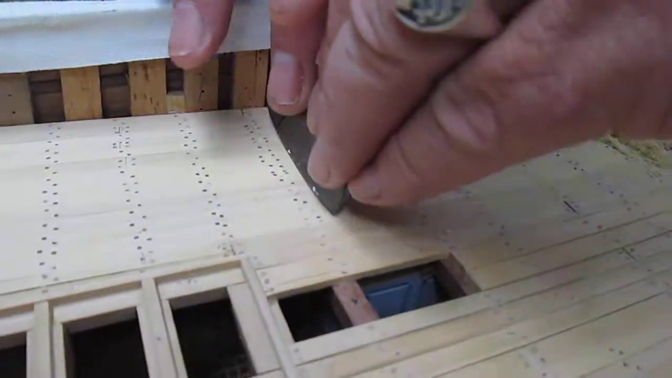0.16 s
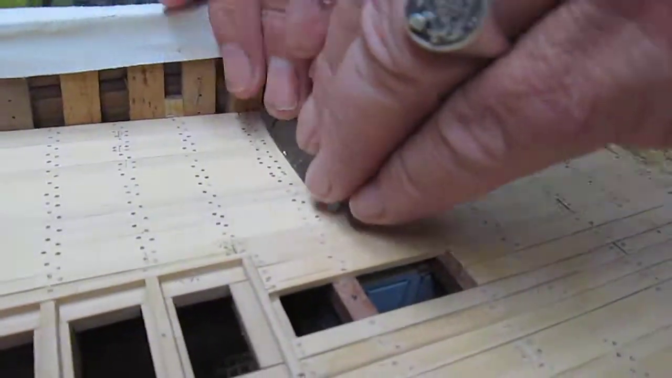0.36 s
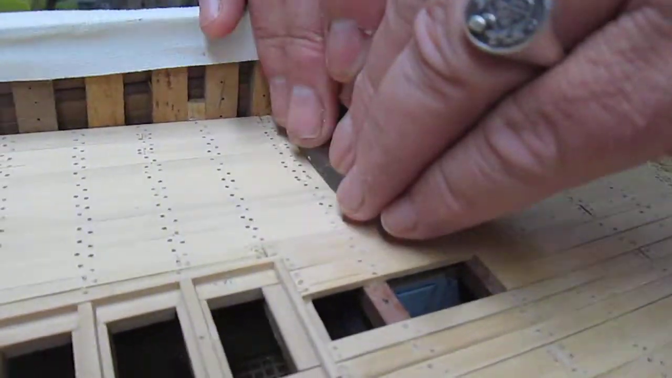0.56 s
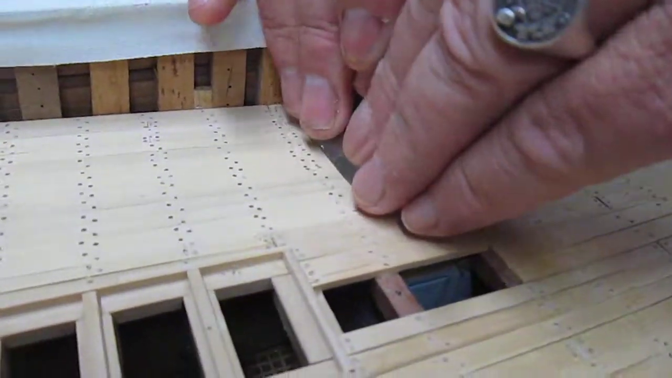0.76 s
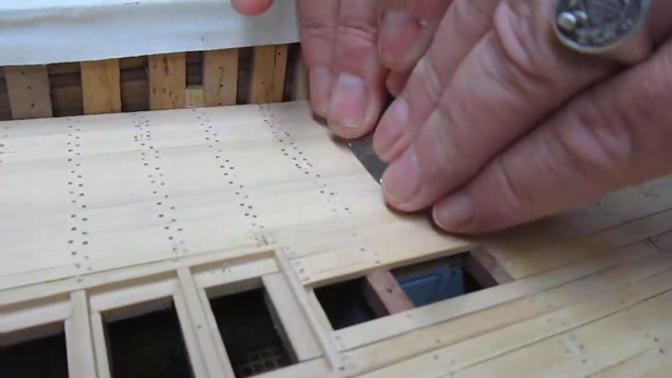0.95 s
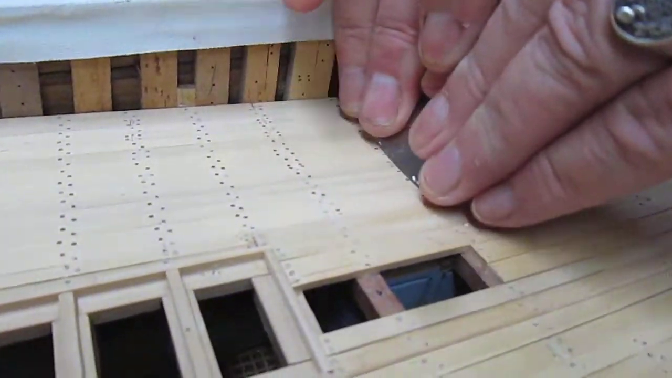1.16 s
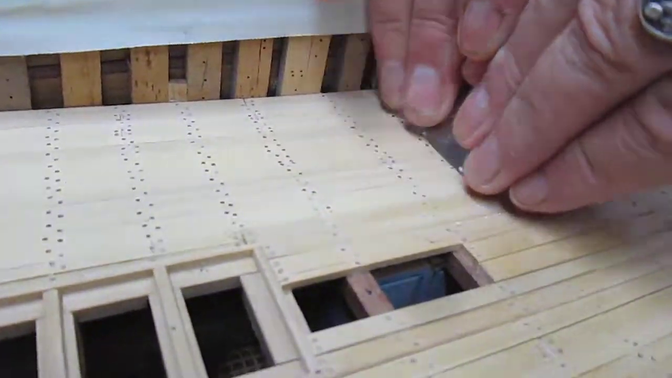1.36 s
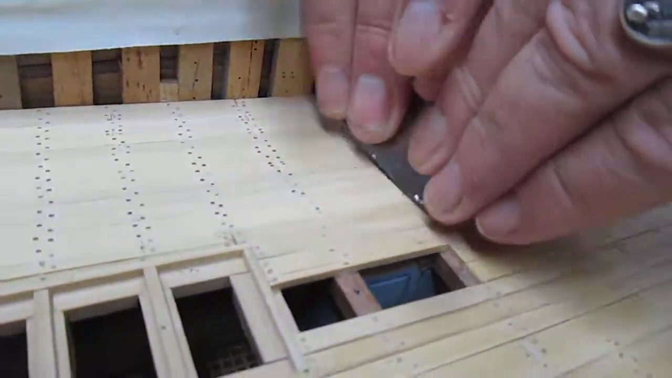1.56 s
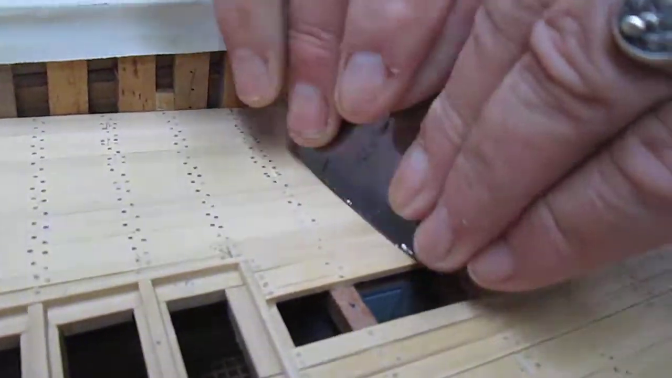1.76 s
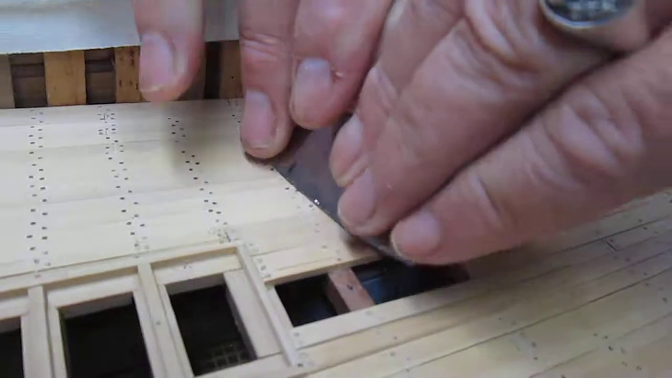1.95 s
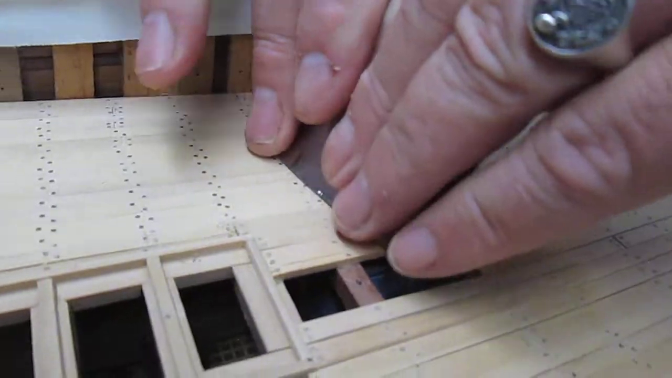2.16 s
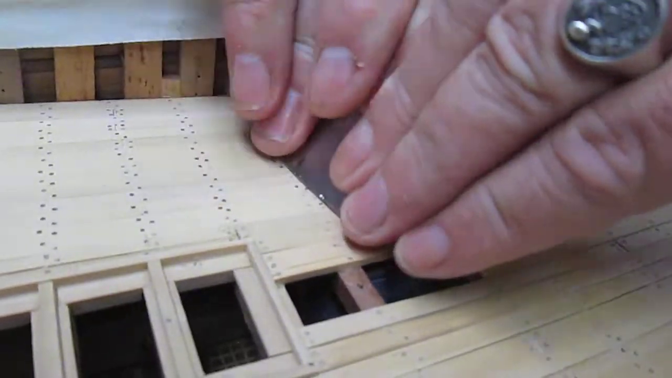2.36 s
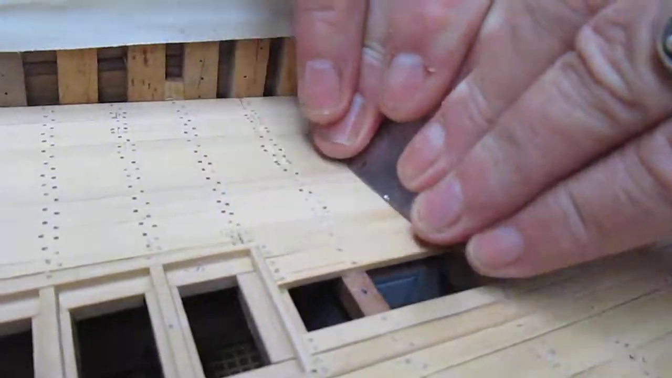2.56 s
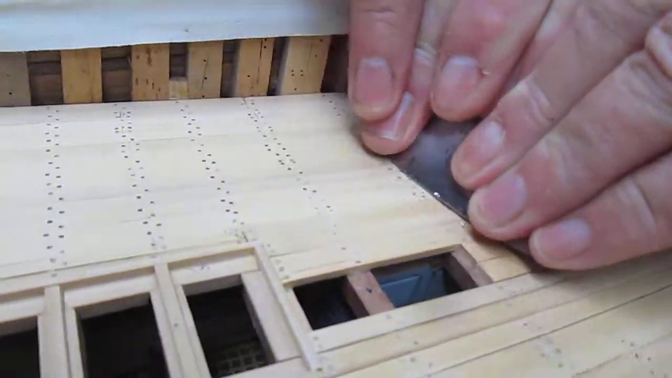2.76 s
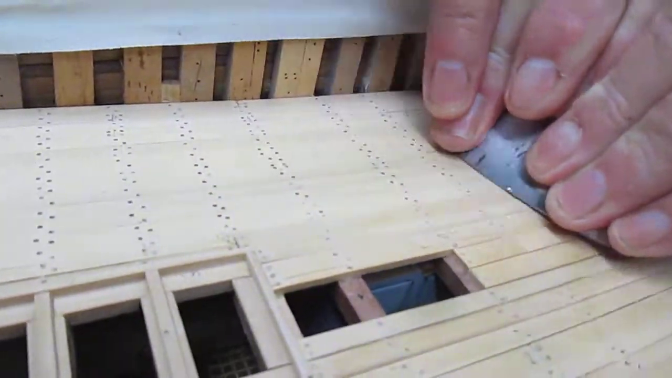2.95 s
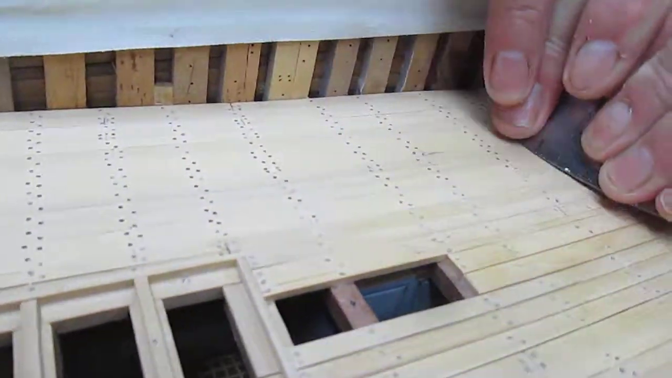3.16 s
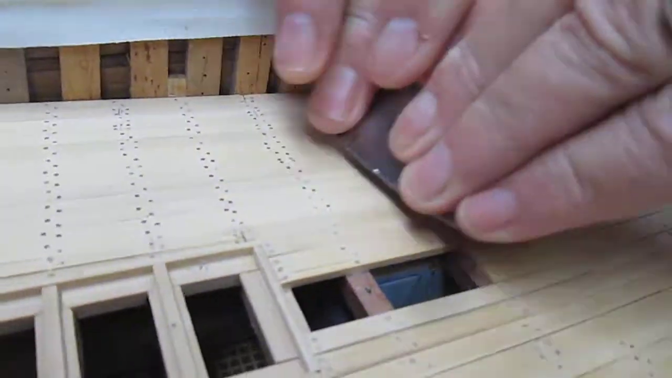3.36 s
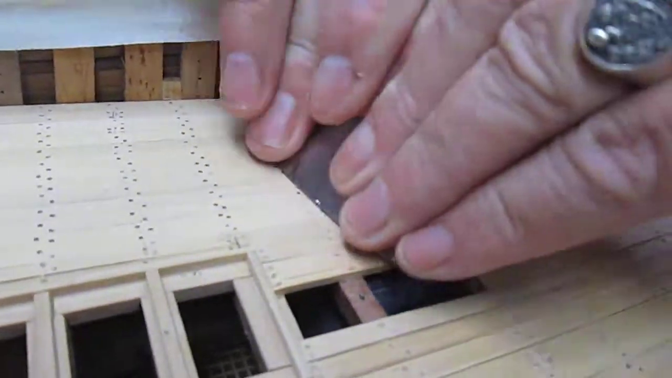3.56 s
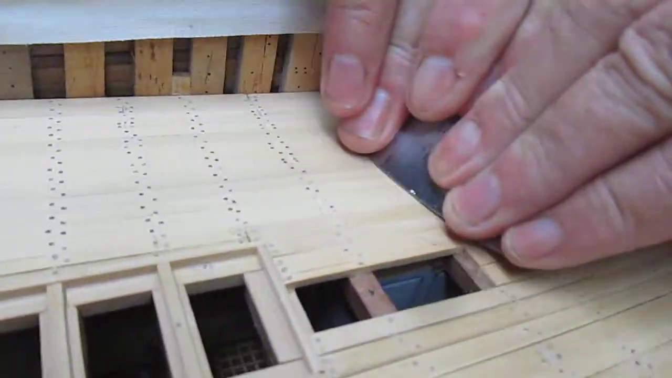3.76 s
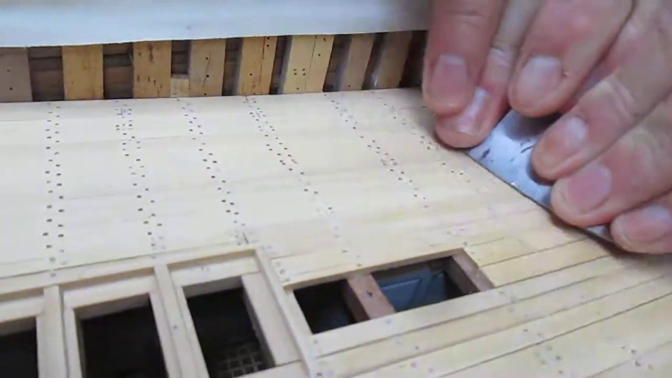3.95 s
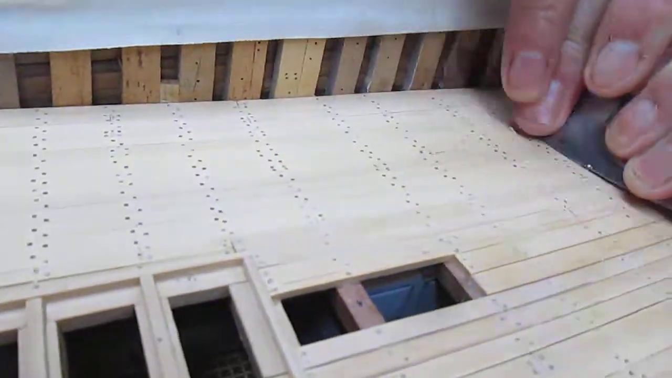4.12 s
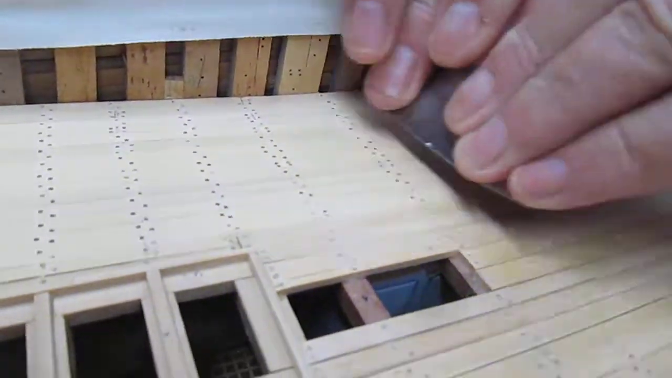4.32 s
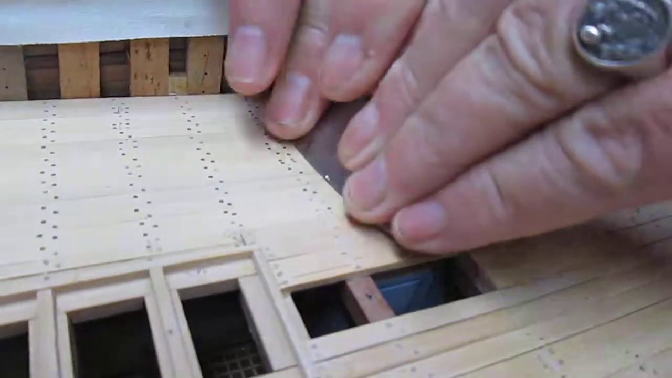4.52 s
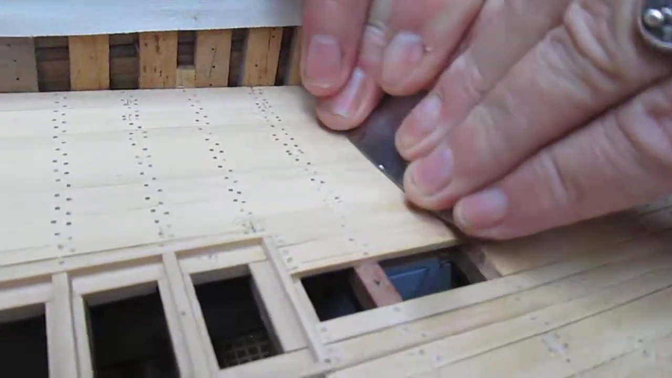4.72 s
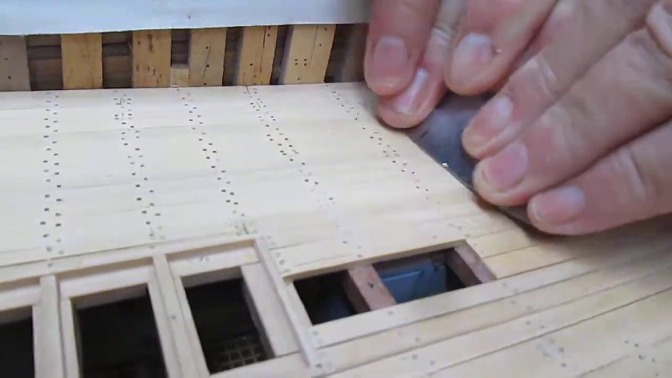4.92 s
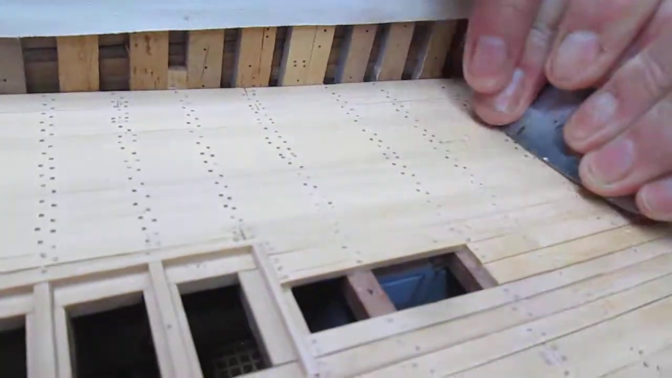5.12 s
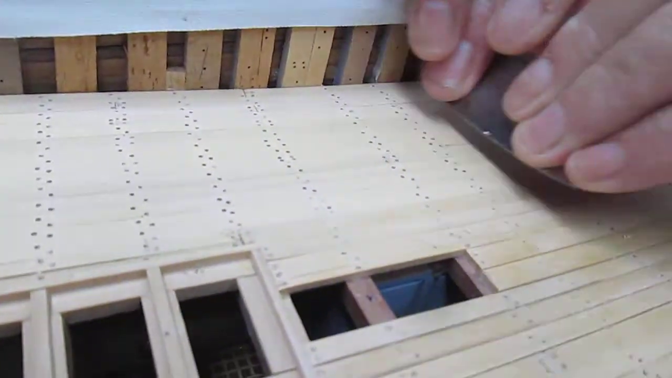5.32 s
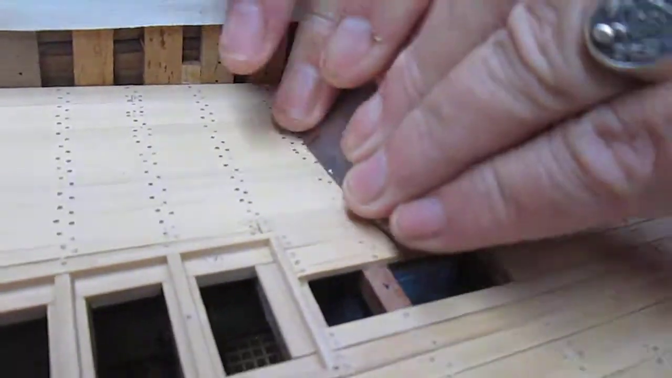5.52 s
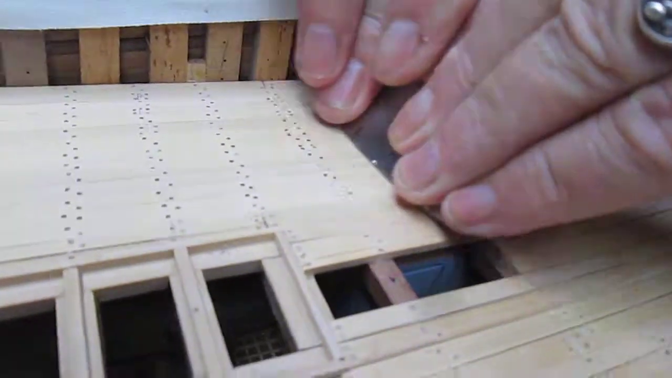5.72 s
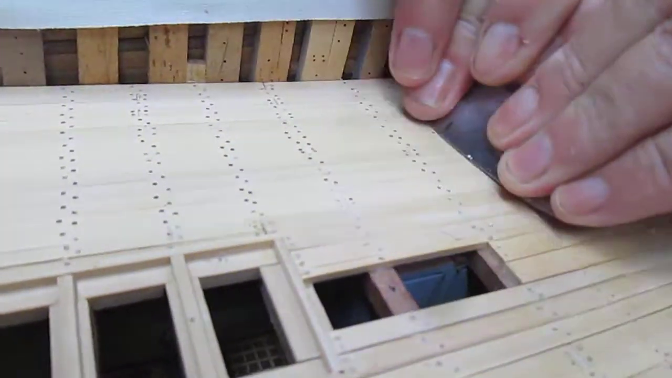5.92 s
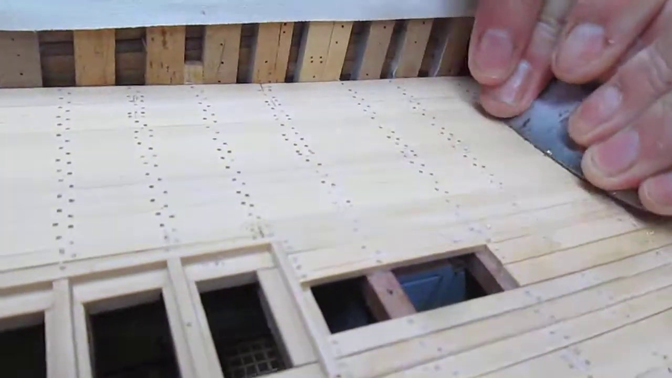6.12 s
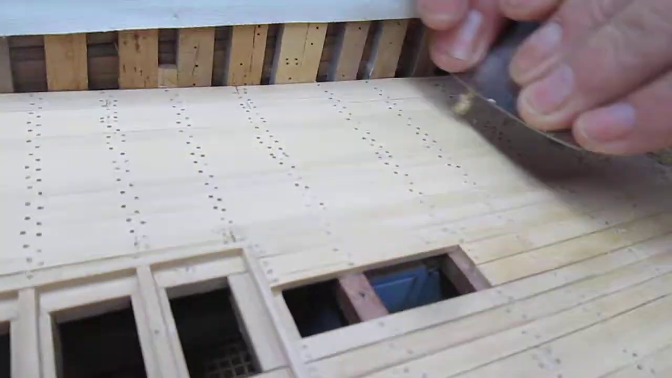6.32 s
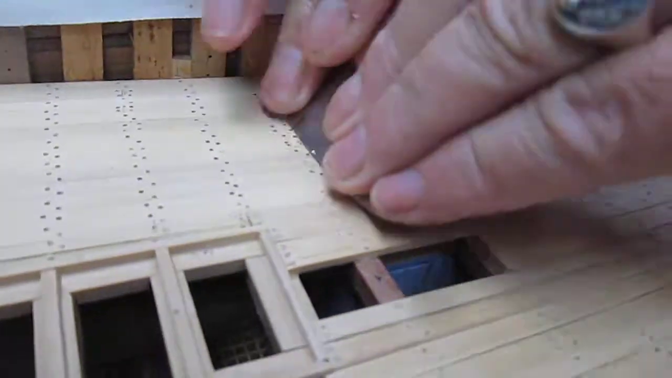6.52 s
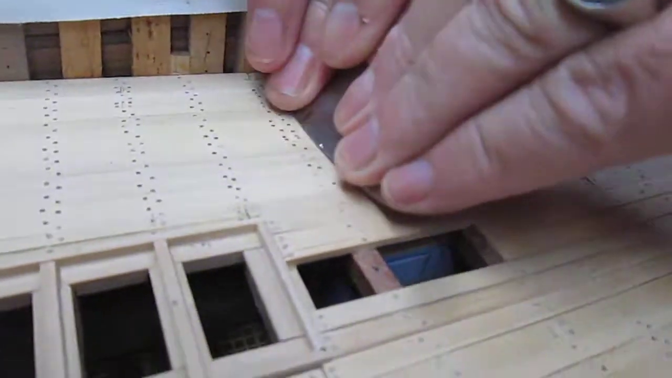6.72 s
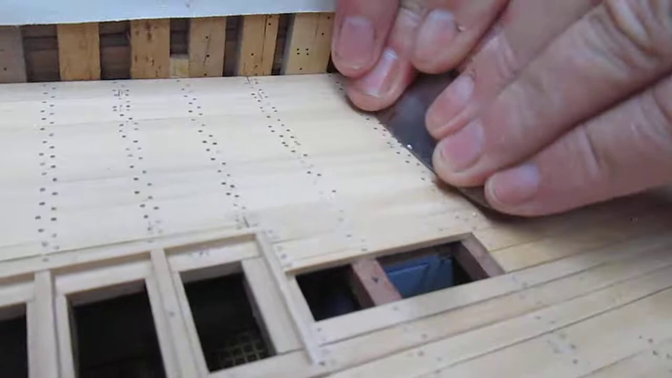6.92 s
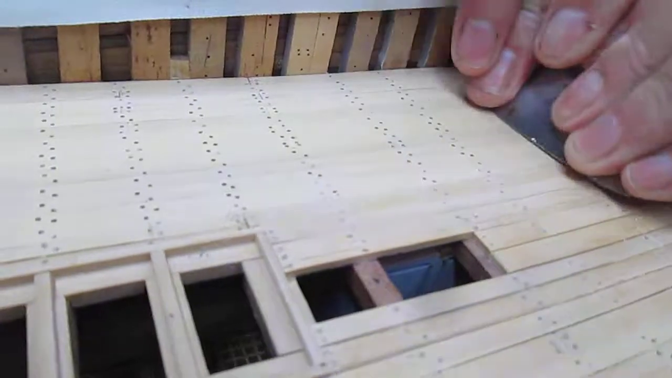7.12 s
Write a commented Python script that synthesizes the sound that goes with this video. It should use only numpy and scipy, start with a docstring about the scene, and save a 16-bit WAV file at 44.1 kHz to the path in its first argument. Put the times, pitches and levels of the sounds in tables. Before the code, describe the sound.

Close and centred, in a quiet workshop with low room hum and a thin high whine. A faint sliding hiss starts, and at 0.13 s a steel scraper knocks on thin hollow planking. Light slides follow, then two short, strong rasps at 0.7 and 0.9 s, with tiny clicks. From 1.1 to 2 s come weaker, broken scratches and a brighter knock near 1.6 s. A near pause holds faint taps. At 2.45 s scraping resumes in quick bursts, merging into a rough stroke until about 3.2 s. A cluster of knocks at 3.4 s leads to a long stroke from 3.55 to 4.15 s; similar ones run at 4.6-5.2, 5.6-6.2 and 6.7-7.1 s, most preceded by a small tap. Each is grainy, stuttering and woody, shifting colour midway, with bright edge hiss, splintery crackle and snagging snaps. Hum sinks beneath strokes and creeps back between them.

```python
"""A soft sliding hiss comes first, then the knock of a steel hand scraper set down on thin planking.
Its strokes follow: the edge sticks and slips along the grain, tearing noisy clumps and catching on seams.
The planking lies over a hollow frame in a workshop and colours the rasp differently as the blade travels.
Knocks and faint taps ring the modes of the planks; clicks and light slides are short shaped noise.
Between strokes the room hum (filtered noise) and a thin camera whine (three sines) creep back."""
import sys
import numpy as np
from scipy import signal
from scipy.fft import rfft, irfft, next_fast_len
from scipy.io import wavfile

SR = 44100
rng = np.random.default_rng(int(sys.argv[2]) if len(sys.argv) > 2 else 0)


def inscribe(sig):
    """Save sig as 16-bit PCM at rate SR to the path in sys.argv[1].

    A 1-D sig is mono; a 2-D sig holds one channel per row.
    Samples are clipped to [-1, 1] before scaling.
    """
    pcm = np.round(np.clip(np.atleast_2d(sig).T, -1, 1) * 32767)
    wavfile.write(sys.argv[1], SR, pcm.astype(np.int16))


N = 316329  # length in samples, about 7.2 s


def amp(db):
    """Turns decibels into a gain."""
    return 10 ** (np.asarray(db) / 20)


def unit(x):
    """Scales a signal to rms 1."""
    return x / np.sqrt(np.mean(x ** 2) + 1e-20)


def read(points, hz):
    """Reads a table at any frequency, in straight lines over log frequency."""
    f, value = np.transpose(points)
    return np.interp(np.log(hz + 1), np.log(f + 1), value)


def add(mix, s, sound):
    """Mixes a sound in at time s (seconds)."""
    part = mix[max(round(s * SR), 0):][:len(sound)]
    part += sound[:len(part)]


def bell(middle_s, half_s):
    """A smooth swell of height 1."""
    distance = (np.arange(N) / SR - middle_s) / half_s
    return np.exp(-np.minimum(distance ** 2, 50))


def wobble(rate_hz):
    """Smooth random motion of rms 1, mostly slower than the given rate."""
    size = next_fast_len(N, True)
    hz = np.fft.rfftfreq(size, 1 / SR)
    smooth = rfft(rng.standard_normal(size)) / (1 + (hz / rate_hz) ** 4)
    return unit(irfft(smooth, size)[:N])


def colour(x, spectrum, size=4096):
    """Filters with the shape of a spectrum; the filter has unit energy and never sounds ahead of its input."""
    hz = abs(np.fft.fftfreq(size, 1 / SR))
    log_gain = np.log(amp(np.maximum(read(spectrum, hz), -100)))
    # the Hilbert transform gives the phase that puts the energy as early as possible
    minimum_phase = np.exp(np.conj(signal.hilbert(log_gain)))
    taps = np.fft.ifft(minimum_phase).real[:size // 2]
    return signal.oaconvolve(x, taps / np.linalg.norm(taps))[:N]


# strokes of the blade: (start [s], rise [s], hold [s], release [s], planking level [dB], edge level [dB],
# extra level of the edge's first bite [dB], speed [plank lengths per s])
STROKES = [(0.711, 0.066, 0.087, 0.081, -19, -31.5, 2, .5), (0.92, 0.039, 0.14, 0.018, -20, -38, 2, .5),
           (1.127, 0.0081, 0.014, 0.054, -29.5, -52, -17, .5),
           (1.283, 0.01, 0.063, 0.083, -33, -42.5, 7, .5), (1.57, 0.015, 0.0044, .13, -29, -48, 13, 0.59),
           (1.672, 0.14, 0.043, 0.024, -35, -40.5, -3, .5), (1.872, 0.018, 0.0045, 0.19, -35, -55, 9.5, .5),
           (2.452, .01, .1, 0.031, -22.5, -31.5, 8, .5), (2.616, 0.039, 0.057, 0.042, -17, -34, 0.5, .5),
           (2.73, 0.023, 0.31, 0.16, -22.5, -37, -0.5, 2.66),
           (3.536, 0.094, 0.39, .18, -21.5, -32.5, 6.5, 1.36),
           (4.606, 0.032, .47, .15, -20.5, -32, 5.5, 1.34), (5.615, 0.059, .46, 0.12, -20, -32.5, 7, 1.55),
           (6.667, .11, 0.31, 0.23, -19, -31.5, 3, 1.6)]
# the blade nearly stops in the middle of a stroke: (time [s], half length [s], depth [dB])
STALLS = [(2.745, 0.0041, 8), (3.801, 0.0068, 10), (3.834, .012, 4.5), (4.839, 0.015, 22),
          (6.092, 0.029, 7), (6.898, 0.0072, 7)]
BITE_S = 0.079  # the fresh edge cuts differently, mostly brighter, for about this long
RISE_DB, RISE_SHAPE = 34.5, 1.39  # the pressure grows by this much as a stroke starts, quickly at first
WOOD_RELEASE_DB, WOOD_RELEASE_SHAPE = 38, 1.15  # as the hand lets go, the planking fades first
EDGE_RELEASE_DB, EDGE_RELEASE_SHAPE = 41, 2.26  # while the edge hisses on until it lifts
CROSSING = 0.17  # plank lengths over which the colour turns from near to far


def hand():
    """Each stroke bites, holds and lets go: planking gain, edge gain, place from near (0) to far (1)."""
    wood, edge, place = np.zeros((3, N))
    for start, rise, hold, release, wood_db, edge_db, bite_db, speed in STROKES:
        t = np.arange(0, rise + hold + 2 * release, 1 / SR)
        press_db = -RISE_DB * np.maximum(1 - t / rise, 0) ** RISE_SHAPE
        lift = np.maximum(t - rise - hold, 0) / release
        fresh = np.exp(-(np.maximum(t - rise, 0) / BITE_S) ** 2)
        wood_fade_db = WOOD_RELEASE_DB * lift ** WOOD_RELEASE_SHAPE
        edge_fade_db = EDGE_RELEASE_DB * lift ** EDGE_RELEASE_SHAPE
        add(wood, start, amp(wood_db + press_db - wood_fade_db))
        add(edge, start, amp(edge_db + press_db + bite_db * fresh - edge_fade_db))
        # the colour turns around the middle of the plank
        add(place, start, np.clip((speed * t - .5) / CROSSING + .5, 0, 1))
    moving = amp(-sum(depth_db * bell(s, half_s) for s, half_s, depth_db in STALLS))
    return wood * moving, edge * moving, np.minimum(place, 1)


def stick_slip(slips_hz=170, uneven=.4, release=1.0, drag=0.62, grain_db=2.0, grain_hz=65):
    """Friction builds and lets go in uneven slips; harder and softer fibres vary their size."""
    turns = np.cumsum(slips_hz * np.exp(uneven * wobble(slips_hz))) / SR
    slip = np.exp(-(turns % 1) / release)  # jumps up, then dies away within each turn
    return unit((drag + slip) * amp(grain_db * wobble(grain_hz)))


def flexing(force, ring_s, share, shift_hz, size=1024, count=4):
    """Waves bounce briefly in a thin plate; its resonances shift as the hand moves and bends it."""
    echoes = rng.standard_normal((count, size)) * np.exp(-np.arange(size) / SR / ring_s)
    echoes /= np.linalg.norm(echoes, axis=1, keepdims=True)
    # blend several random echo patterns, with drifting weights of steady total power
    flex = np.array([wobble(shift_hz) for _ in range(count)])
    weights = flex / np.linalg.norm(flex, axis=0)
    echoed = signal.oaconvolve(force[None], echoes, axes=1)[:, :N]
    ring = (weights * echoed).sum(0)
    return (force + share * ring) / np.hypot(1, share)


def blade(force):
    """The steel rings only briefly: the fingers damp it within a few milliseconds."""
    return flexing(force, ring_s=0.0013, share=0.77, shift_hz=10.2)


def along_plank(force, place, near, far):
    """The colour turns from near to far as the blade travels."""
    return (1 - place) * colour(force, near) + place * colour(force, far)


# colour of the planking at both ends of a stroke: (frequency [Hz], relative level [dB per Hz])
WOOD_NEAR = [(59, -71), (100, -32.5), (253, -19.5), (301, -26.5), (350, -8), (461, -9), (571, 2),
             (655, -3.5), (707, 2), (762, -5.5), (1260, 3.5), (1580, -14.5), (2000, -25.5), (2600, -20),
             (4400, -120)]
WOOD_FAR = [(59, -76), (100, -36), (253, -20), (313, -36), (378, -11), (616, -4.5), (752, 6.5), (853, -3.5),
            (1020, 11), (1200, 5.5), (1460, -3.5), (1600, -5), (1720, -21), (2000, -7.5), (2600, -31.5),
            (4400, -120)]
# colour of the steel edge at both ends of a stroke: (frequency [Hz], relative level [dB per Hz])
EDGE_NEAR = [(900, -37), (1700, 1), (2250, 3.5), (2900, 1.5), (3400, 0.5), (4500, 0), (6200, -2),
             (7900, -8), (9200, -14), (11000, -22.5), (15000, -50)]
EDGE_FAR = [(1000, -37), (1700, -0.5), (2020, 0), (2380, -9), (2810, -4.5), (3400, -7), (3970, 2.5),
            (4850, -10.5), (6550, -6.5), (9010, -13.5), (9510, -26.5), (10800, -23.5), (15000, -42)]


def scrape(wood_gain, edge_gain, place, wood_db=0, edge_db=0.0, tear_db=2, tear_hz=1400):
    """Each slip tears a clump of fibres, which shakes the planking and the steel edge."""
    slips = stick_slip()
    push = flexing(slips * rng.standard_normal(N), ring_s=0.0064, share=0.38, shift_hz=7.5)
    tearing = unit(slips * amp(tear_db * wobble(tear_hz)) * rng.standard_normal(N))
    wood = along_plank(push * wood_gain, place, WOOD_NEAR, WOOD_FAR)
    edge = along_plank(blade(tearing) * edge_gain, place, EDGE_NEAR, EDGE_FAR)
    return amp(wood_db) * wood + amp(edge_db) * edge


# colour of a snap, also used by the splinters: (frequency [Hz], relative level [dB per Hz])
SNAP = [(900, -5), (2000, 2.5), (3600, 5), (6300, 3.5), (8800, -3.5), (11000, -20), (13000, -30),
        (16000, -53)]
# the edge catches on a seam or a hard fibre: (time [s], relative snap level [dB],
# relative level of the thud in the planking [dB])
CATCHES = [(0.5428, -38, -32.5), (0.9394, -36, -14.5), (0.9654, -28.5, -7), (1.128, -16.5, -7.5),
           (1.1388, -12, -9), (1.291, -15, -11), (1.45, -40, -34), (2.459, -19, -13), (2.589, -27, -40),
           (2.706, -20, -19), (2.757, -17, -11), (2.8631, -15.5, -6), (2.9007, -18, -11),
           (3.0662, -16, -37), (3.5997, -11, -28), (3.7817, -11.5, -19), (3.887, -20.5, -14),
           (4.0248, -24, -28), (4.8079, -17, -10), (4.857, -20.5, -13.5), (4.8693, -14, -28),
           (5.8252, -14, -13), (5.952, -16, -18), (5.974, -14.5, -10), (6.113, -16.5, -11),
           (6.1992, -22, -22), (6.8867, -13, -14), (6.9177, -14.5, -20), (6.989, -15, -10)]


def catches(place, snap_db=-8, thud_db=-5, length_s=0.0068):
    """A caught edge snaps free in a short noise burst and thuds in the planking."""
    snap, thud, t = np.zeros(N), np.zeros(N), np.arange(SR // 20) / SR
    for s, db, wood_db in CATCHES:
        burst = np.exp(-(t / length_s) ** 2) * rng.standard_normal((2, len(t)))
        add(snap, s, amp(db) * burst[0])
        add(thud, s, amp(wood_db) * burst[1])
    steel = colour(blade(snap), SNAP)
    wood = along_plank(thud, place, WOOD_NEAR, WOOD_FAR)
    return amp(snap_db) * steel + amp(thud_db) * wood


def splinters(edge_gain, per_s=22, splinter_db=-2, spread_db=3, length_s=0.0041):
    """Small fibres break at random under the moving edge, each in a short bright burst."""
    sizes = amp(spread_db * np.minimum(rng.exponential(1, N), 2))
    breaks = (rng.random(N) < per_s / SR) * sizes
    t = np.arange(SR // 40) / SR
    bursts = signal.oaconvolve(breaks, np.exp(-(t / length_s) ** 2))[:N]
    force = edge_gain * bursts * rng.standard_normal(N)
    return amp(splinter_db) * colour(blade(force), SNAP)


# modes (natural tones) of the planking: (frequency [Hz], relative level [dB], time to fall by 60 dB [s])
PLANK_MODES = [(247, -14, 0.029), (367, -13.5, .11), (415, -18.5, 0.092), (448.6, -11.5, 0.047),
               (564, -4.5, 0.031), (681, -1, 0.029), (951, -10, 0.033), (1151, -0.5, 0.016),
               (1416, -11.5, 0.027), (1691, -16, 0.043), (2350, -29, 0.0055)]


def plank_ring(pitch_hz, octaves=1.0, contact_s=0.0014):
    """One blow of peak 1 rings the plank modes, favouring those near one pitch."""
    t = np.arange(SR // 4) / SR
    hz, db, t60 = np.transpose(PLANK_MODES)[:, :, None]
    weight = amp(db) / (1 + (np.log2(hz / pitch_hz) / octaves) ** 2)
    detune = 1 + 0.038 * rng.standard_normal(hz.shape)  # every blow rings slightly differently
    turns = hz * t * detune + rng.random(hz.shape)
    ring = (weight * amp(-60 * t / t60) * np.sin(2 * np.pi * turns)).sum(0)
    ring = ring * (1 - np.exp(-t / contact_s))  # soft onset
    return ring / abs(ring).max()


# knocks of the blade set down, and faint handling taps on the wood: (time [s], relative peak level [dB],
# favoured pitch [Hz], relative tick level [dB], rebound level against the main blow [dB])
KNOCKS = [(0.131, -12, 570, -33, -10), (1.182, -25.5, 500, -38, -13), (1.577, -15, 1030, -28, -9),
          (2.142, -25, 1280, -41.5, -14), (2.323, -35, 520, -50, -13), (2.377, -37, 447, -63, -20),
          (2.612, -24.5, 603, -60, -20), (3.359, -39, 493, -60, -22), (3.421, -13, 610, -30.5, -7),
          (3.444, -16.5, 710, -27, -5), (3.461, -24.5, 345, -41, -21), (4.426, -17, 945, -31.5, -3.5),
          (4.558, -40, 514, -55, -15), (5.503, -19, 774, -38.5, -3.5), (6.399, -41.5, 1100, -56, -9.5),
          (6.5199, -13.5, 750, -27, -19)]
REBOUND_S, REBOUND_PITCH = 0.007, 0.32  # a second blow follows this much later, duller by this ratio


def knocks(wood_db=5.5, tick_db=4, tick_s=0.0024):
    """Each knock or faint tap ticks, rings the planking and rebounds once with a duller blow."""
    wood, ticks, t = np.zeros(N), np.zeros(N), np.arange(SR // 4) / SR
    for s, peak_db, pitch_hz, bright_db, rebound_db in KNOCKS:
        add(wood, s, amp(peak_db) * plank_ring(pitch_hz))
        add(wood, s + REBOUND_S, amp(peak_db + rebound_db) * plank_ring(pitch_hz * REBOUND_PITCH))
        add(ticks, s, amp(bright_db) * np.exp(-t / tick_s) * rng.standard_normal(len(t)))
    return amp(wood_db) * wood + amp(tick_db) * colour(ticks, EDGE_NEAR)


# the corner of the blade clicks on the wood: (time [s], level [dB])
CLICKS = [(0.674, -16.5), (0.727, -17), (0.908, -16), (1.152, -13), (2.634, -20)]
# colour of a click: (frequency [Hz], relative level [dB per Hz])
CLICK_COLOUR = [(500, 14), (2500, 5.5), (7000, -5), (9500, 3), (11000, -12), (14000, -27)]


def clicks(click_db=0, decay_s=0.00073):
    """Bare steel touching hard wood gives a tiny click, a very short burst of noise."""
    force, t = np.zeros(N), np.arange(SR // 50) / SR
    for s, db in CLICKS:
        add(force, s, amp(db) * np.exp(-t / decay_s) * rng.standard_normal(len(t)))
    return amp(click_db) * colour(force, CLICK_COLOUR)


# light sliding of blade and fingers between strokes: (middle [s], half length [s], relative level [dB])
GLIDES = [(0.03, 0.097, -42), (0.3, 0.1, -42.5), (0.428, 0.037, -39), (0.577, 0.099, -47),
          (1.98, 0.034, -43), (3.498, .14, -46.5), (4.396, 0.057, -53.5), (5.55, 0.073, -52.5)]
# colour of light sliding: (frequency [Hz], relative level [dB per Hz])
SLIDE_COLOUR = [(200, -16), (500, -11.5), (1500, -14.5), (2700, -22.5), (4000, -23), (5100, -20),
                (6200, -25.5), (7200, -24), (9500, -33.5), (13000, -62)]


def slides(slide_db=-1.5, uneven_db=1.5):
    """Barely pressed, steel and skin only hiss over the wood."""
    touch = sum(amp(db) * bell(s, half_s) for s, half_s, db in GLIDES)
    hiss = touch * amp(uneven_db * wobble(60)) * rng.standard_normal(N)
    return amp(slide_db) * colour(hiss, SLIDE_COLOUR)


def swish(at_s=0.427, half_s=0.032, swish_db=-41, centre_hz=3250, width_hz=700):
    """The edge skims the wood once with a soft, narrow hiss."""
    edges_hz = [centre_hz - width_hz / 2, centre_hz + width_hz / 2]
    band = signal.butter(2, edges_hz, "band", fs=SR, output="sos")
    return amp(swish_db) * bell(at_s, half_s) * unit(signal.sosfilt(band, rng.standard_normal(N)))


# ring of the frame and the room: (frequency [Hz], time to fall by 60 dB [s])
RING = [(150, 0.29), (400, 0.24), (1200, 0.12), (4000, 0.12), (12000, 0.096)]


def ring_out(x, ring_db=-13, size=256):
    """Dense reflections in the frame and the room, each band dying at its own speed."""
    late_noise = rng.standard_normal(SR // 2) * (np.arange(SR // 2) > size)
    hz, t, bands = signal.stft(late_noise, SR, nperseg=size)
    decay = amp(-60 * t / read(RING, hz)[:, None])
    tail = signal.istft(bands * decay, SR, nperseg=size)[1]
    return x + amp(ring_db) * signal.fftconvolve(x, tail / np.linalg.norm(tail))[:N]


# colour of the room hum: (frequency [Hz], relative level [dB per Hz])
HUM = [(30, -12.5), (90, 3.5), (250, -1), (500, 3.5), (1000, -8), (2000, -7.5), (3200, -16), (6000, -21.5),
       (9500, -26.5), (14000, -30)]
# whine of the camera, before loud work lowers it: (frequency [Hz], rms level [dB])
WHINE = [(3935, -65), (7866, -70), (11793, -68)]


def background(work, hum_db=-44.0, knee_db=-31, duck=1.32, sense_s=0.15, recover_db=9):
    """Hum and whine sink as sustained loud work pulls their gain down, then creep back."""
    t = np.arange(N) / SR
    whine = sum(amp(db) * np.sqrt(2) * np.sin(2 * np.pi * hz * t) for hz, db in WHINE)
    hum = amp(hum_db) * colour(rng.standard_normal(N), HUM)
    keep = np.exp(-1 / (sense_s * SR))
    work_power = signal.lfilter([1 - keep], [1, -keep], work ** 2)
    work_db = 10 * np.log10(work_power + 1e-12)
    # the held level follows rises but falls by no more than recover_db per second
    held_db = np.maximum.accumulate(work_db + recover_db * t) - recover_db * t
    return (hum + whine) * amp(-duck * np.maximum(held_db - knee_db, 0))


def scene():
    """All of the work happens straight ahead, so both channels hear it alike."""
    wood_gain, edge_gain, place = hand()
    cutting = scrape(wood_gain, edge_gain, place) + splinters(edge_gain) + catches(place)
    work = ring_out(cutting + knocks() + clicks() + slides() + swish())
    return np.tile(work + background(work), (2, 1))


def record(dry, hiss_db=-68, offset=0.0048, ceiling=.48, cut_hz=16000):
    """The input rounds off the highest peaks and adds faint hiss and an offset; then the band limit."""
    rounded = dry / (1 + (dry / ceiling) ** 4) ** (1 / 4)
    noisy = rounded + offset + amp(hiss_db) * rng.standard_normal(dry.shape)
    low_pass = signal.firwin(511, cut_hz, window=("kaiser", 9), fs=SR)
    return signal.oaconvolve(noisy, low_pass[None], "same")


dry = scene()
out = record(dry)
inscribe(out)
```